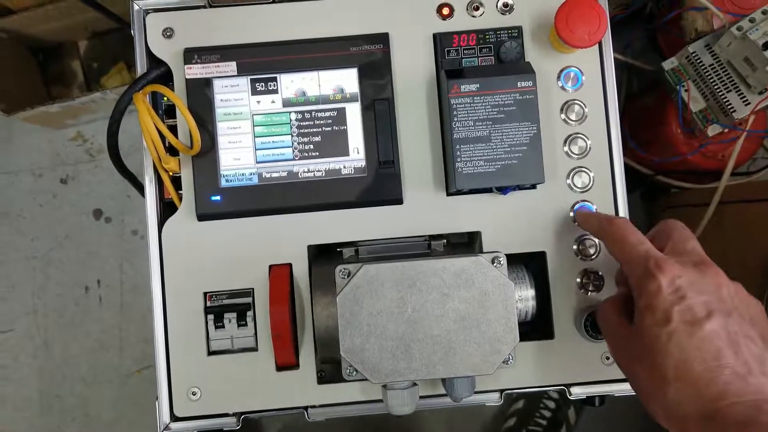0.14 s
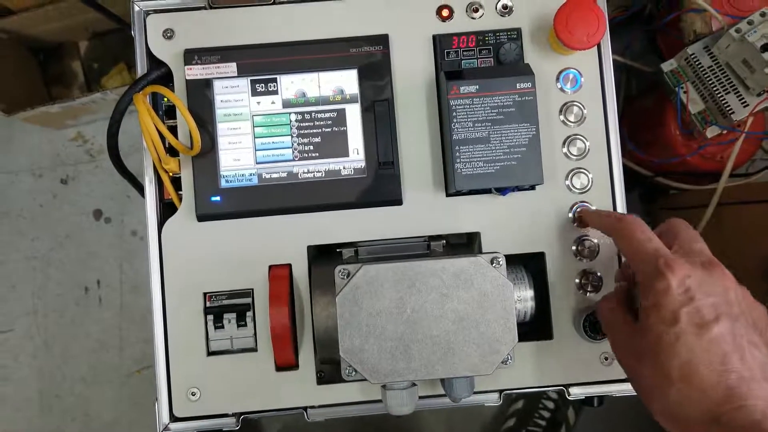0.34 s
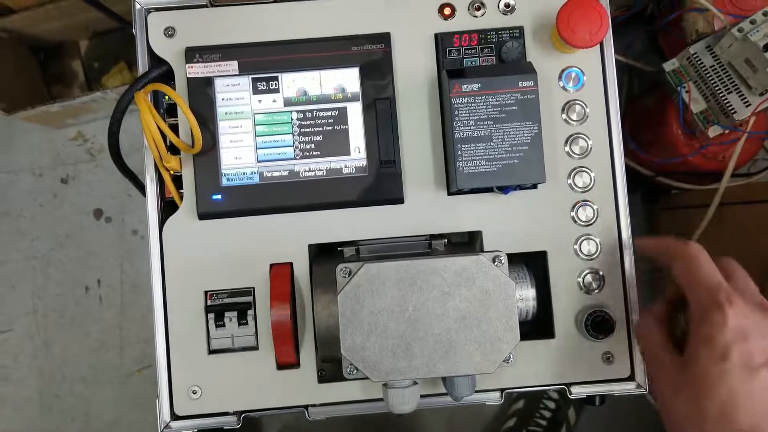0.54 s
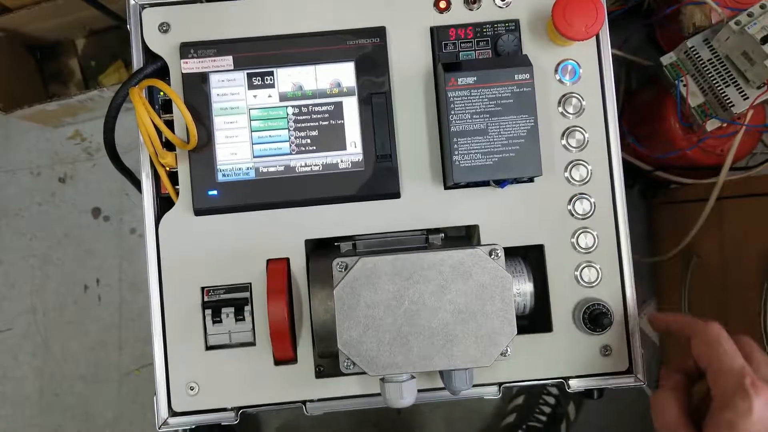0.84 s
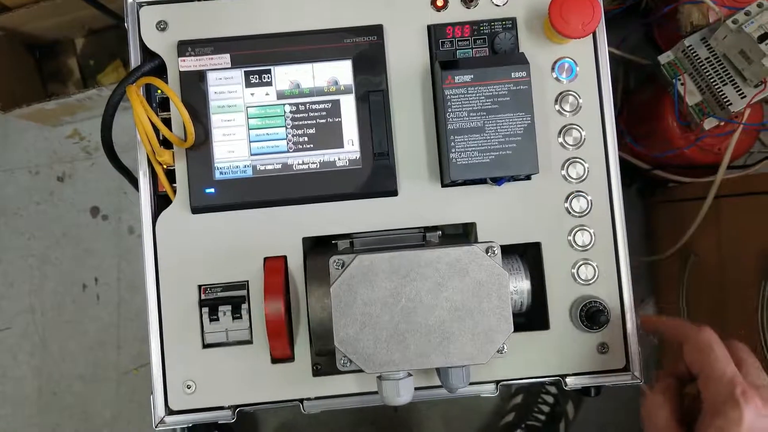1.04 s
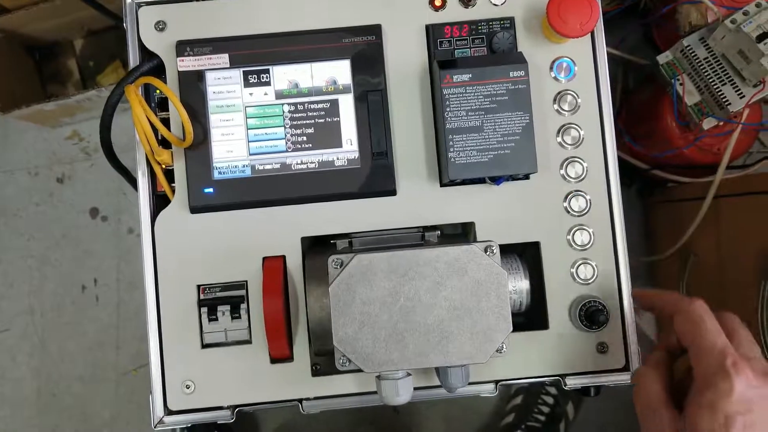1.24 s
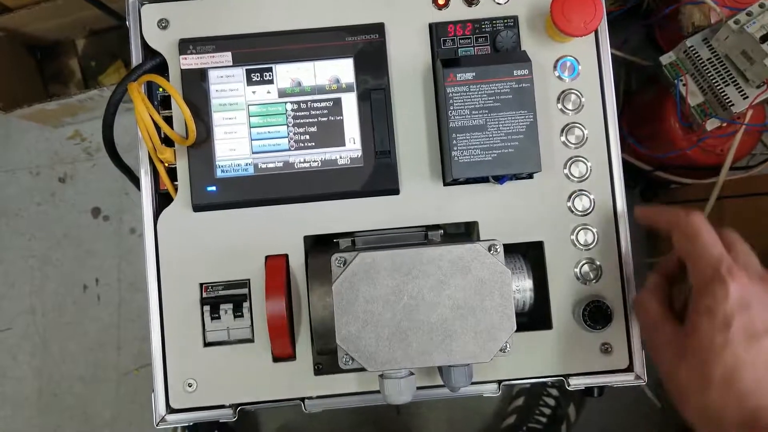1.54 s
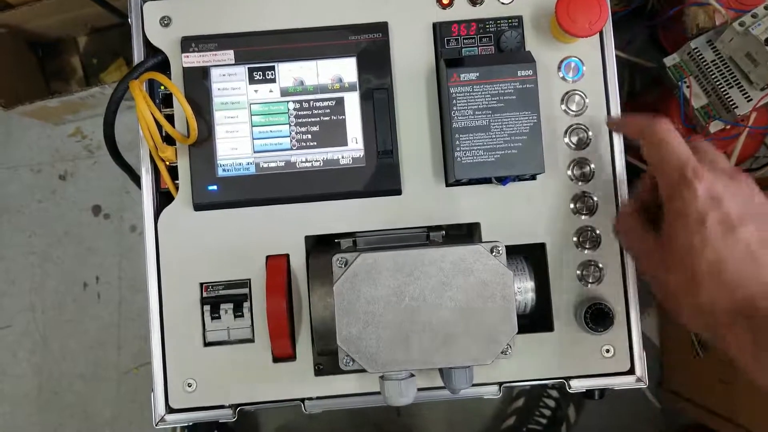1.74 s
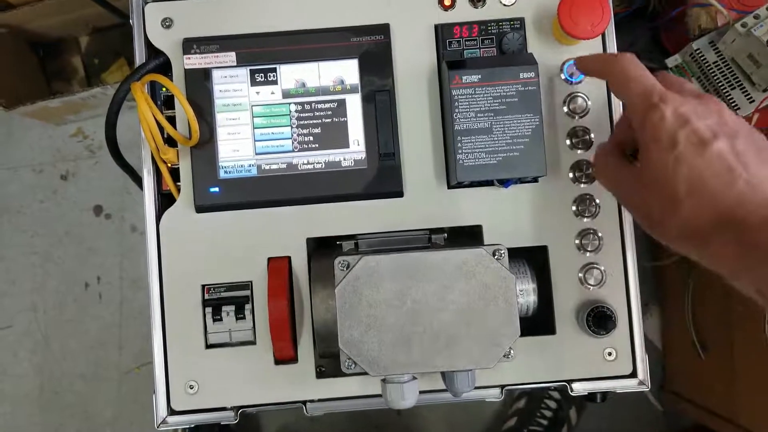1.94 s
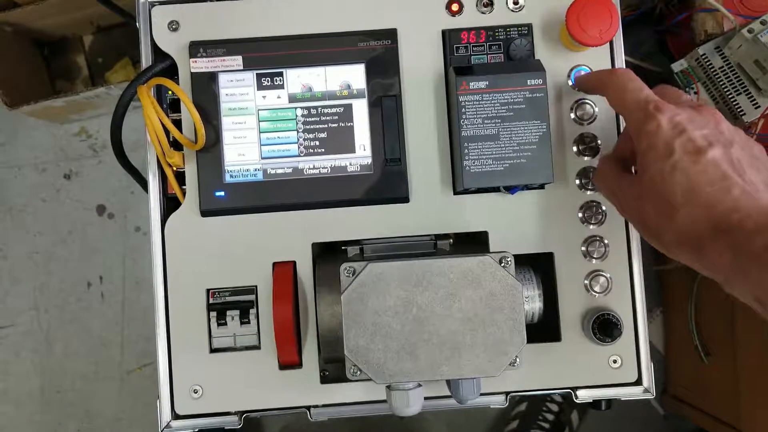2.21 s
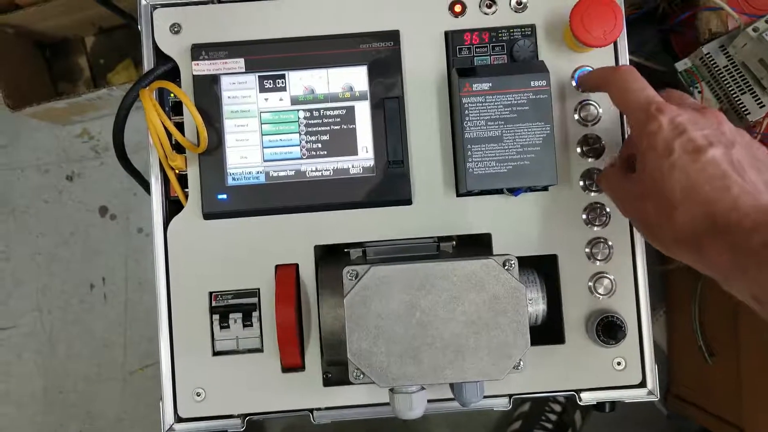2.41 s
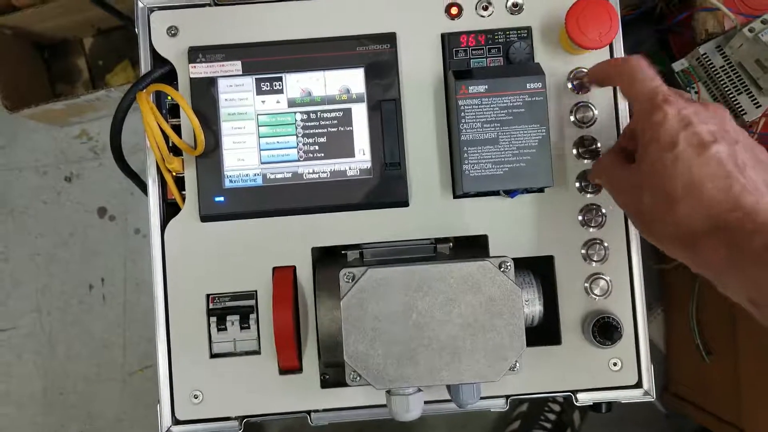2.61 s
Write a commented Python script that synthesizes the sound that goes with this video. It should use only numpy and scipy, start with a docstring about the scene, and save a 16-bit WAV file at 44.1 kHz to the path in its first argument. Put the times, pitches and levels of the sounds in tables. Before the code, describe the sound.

Close up in a quiet indoor workshop, a push button snaps with hollow panel knocks, a small motor runs with very high steady whine and about sixteen scratchy squeaks a second, then clicks off and brakes quickly.

```python
"""A small four-pole motor on a test panel, heard close up. At first it creeps, with short squeals and faint idle tones.
A button clicks as a noise burst, and the panel knocks in two quick groups of ringing modes set off by soft pushes.
Then the inverter drives it: sine sidebands whine near 10 kHz, and the shaft rubs and squeals once a turn.
At 2.5 s a second click stops the drive, the panel knocks faintly and the motor brakes to rest.
Running noise follows the motor; quiet room noise and a low rumble last throughout."""
import sys
import numpy as np
from scipy import signal
from scipy.fft import rfft, irfft
from scipy.io import wavfile
from scipy.ndimage import uniform_filter1d

SR = 44100
rng = np.random.default_rng(int(sys.argv[2]) if len(sys.argv) > 2 else 0)


def volts_from_decibels(level):
    """Turn decibel levels (scalar or array-like) into linear amplitude factors."""
    exponent = np.asarray(level, float) / 20
    return 10 ** exponent


def wav_record(signal):
    """Record a signal, one row per channel, as 16-bit PCM in the file named by sys.argv[1]."""
    frames = np.transpose(np.atleast_2d(signal))
    bounded = np.clip(frames, -1, 1)
    # unit amplitude maps onto the largest positive 16-bit level
    quanta = np.round(bounded * 32767).astype(np.int16)
    wavfile.write(sys.argv[1], SR, quanta)


N = 123480
T = np.arange(N) / SR
WHINE_ON_S, WHINE_OFF_S = 0.21, 2.515


def at(table, hz, col=1):
    """Reads a spectrum table on a log frequency axis."""
    table = np.array(table, float)
    return np.interp(np.log(np.maximum(hz, 1)), np.log(table[:, 0]), table[:, col])


def curve(table):
    """Reads a table of (t/s, value) at every sample."""
    return np.interp(T, *np.array(table, float).T)


def walk(rate):
    """Smooth chance with spread 1, taking about rate new values a second."""
    hold = max(int(SR / rate), 30)
    values = rng.standard_normal(N // 30 + 1)[:N // hold + 1]
    steps = np.repeat(values, hold)[:N]
    smooth = uniform_filter1d(uniform_filter1d(steps, hold), hold)
    return smooth / smooth.std()


def bell(center_s, length_s):
    """A smooth rise and fall around one moment."""
    return np.exp(-((T - center_s) / length_s) ** 2 / 2)


def pan(x, db):
    """Makes the left side louder than the right by db."""
    return x * volts_from_decibels(np.array([[db], [-db]]) / 2)


# how much louder noise is on the left: (f/Hz, level left over right/dB)
BALANCE = [(60, 2), (250, -9), (700, -7.5), (2400, -1.5), (5000, -8), (12000, 2.5)]
# how alike noise is on both sides: (f/Hz, likeness from 0 to 1)
LIKENESS = [(60, 0.8), (300, 0.88), (2000, 0.25), (12000, 0.28)]


def noise(tone):
    """Coloured stereo noise, partly alike on both sides; the average of the sides has rms 1."""
    hz = np.arange(N // 2 + 1) * SR / N
    like = np.clip(at(LIKENESS, hz), 0, 1)
    mid, side = rfft(rng.standard_normal((2, N)))
    sign = np.array([[1], [-1]])  # left, right
    spectrum = mid * np.sqrt(1 + like) + sign * side * np.sqrt(1 - like)
    colour = volts_from_decibels(at(tone, hz) + sign * at(BALANCE, hz) / 2)
    x = irfft(spectrum * colour, N)
    return x / x.mean(0).std()


# switching sidebands of the inverter: (order in drive frequencies from the carrier,
# left rms level/dB, right rms level/dB), levels before drift
SIDEBANDS = [(-7, -64, -67), (-5, -51, -62), (-1, -50, -54), (1, -48, -54), (5, -52, -58), (11, -64, -67),
             (13, -64, -70), (17, -60, -70), (19, -61, -74), (23, -64, -72), (29, -62, -68)]
# colour of the hiss around the sidebands: (f/Hz, relative level/dB per Hz)
WHINE_HISS = [(9000, -18.5), (9900, -2), (11000, -3), (12000, -24)]


def inverter_whine():
    """Switching puts sidebands at multiples of the drive frequency around a carrier; each drifts."""
    carrier_hz, drive_hz = 10000.3, 32.39
    out = np.zeros((2, N))
    for order, left_db, right_db in SIDEBANDS:
        cycles = (carrier_hz + order * drive_hz) * T + rng.random()
        # outer sidebands wander more in phase
        phase = 2 * np.pi * cycles + (0.25 + 0.073 * abs(order)) * walk(4.23)
        drift_db = 1.7 * walk(6)
        for side, (db, lead) in enumerate([(left_db, 1.4), (right_db, 0)]):  # lead in radians
            level = volts_from_decibels(db + drift_db + 0.76 * walk(56.4))
            out[side] += level * np.sqrt(2) * np.sin(phase + lead + 0.69 * walk(5.065))
    return out + volts_from_decibels(-54) * noise(WHINE_HISS)


def case_hum():
    """The case hums on one slightly wandering tone."""
    level = volts_from_decibels(-62 + 1.5 * walk(12))
    hum = level * np.sqrt(2) * np.sin(2 * np.pi * 353.6 * T + 0.3 * walk(9))
    return pan(hum, -8)


# faint inverter tones at rest: (f/Hz, typical peak level before panning/dB)
IDLE = [(10000, -67), (9900, -77), (10100, -72)]


def idle_tones():
    """Faint, flickering tones of the idle inverter, before and after the drive."""
    again_s, rise_s = 2.58, 0.032
    lead = np.array([[2.2], [0]])  # radians, left and right
    idle = np.zeros((2, N))
    for hz, db in IDLE:
        phase = 2 * np.pi * hz * T + lead + 0.8 * walk(30)
        idle += volts_from_decibels(db + 4 * walk(35)) * np.sin(phase)
    resting = (T < WHINE_ON_S) + np.clip((T - again_s) / rise_s, 0, 1)
    return resting * pan(idle, 4)


def inverter():
    """Whine and hum rise and fall with the drive; the idle tones sound at rest."""
    rise_s, fall_s = 0.13, 0.0074
    rise = np.clip((T - WHINE_ON_S) / rise_s, 0, 1)
    fall = np.exp(-np.maximum(T - WHINE_OFF_S, 0) / fall_s)
    return rise * fall * (inverter_whine() + case_hum()) + idle_tones()


def shaft_turning():
    """1 while the shaft is driven, then dying away."""
    return (T > WHINE_ON_S) * np.exp(-np.maximum(T - WHINE_OFF_S, 0) / 0.054)


def nearest(times):
    """Index of the nearest of these times, looked up at every eighth sample."""
    return np.abs(T[::8, None] - times).argmin(1).repeat(8)[:N]


# rubs of the shaft, one a turn: (t/s, first squeal level/dB, second squeal level/dB)
RUBS = [(0.3161, -42.5, -45), (0.376, -38.5, -45), (0.4383, -39, -42.5), (0.5007, -33, -42.5),
        (0.561, -34, -44.5), (0.6248, -39, -43.5), (0.6888, -39, -47), (0.75, -42.5, -46.5),
        (0.812, -39.5, -48), (0.873, -37.5, -41.5), (0.938, -38, -44.5), (0.9997, -40, -45.5),
        (1.067, -44, -47.5), (1.1268, -40, -44.5), (1.188, -46, -48.5), (1.252, -38.5, -46.5),
        (1.3123, -34.5, -47.5), (1.3758, -34, -47.5), (1.4355, -33.5, -46), (1.499, -49, -54.5),
        (1.5634, -41, -46.5), (1.625, -36, -45.5), (1.685, -64, -51.5), (1.7487, -38.5, -48.5),
        (1.8096, -36, -48), (1.8706, -43, -50), (1.934, -41.5, -51), (1.9974, -35, -47.5),
        (2.0604, -39, -47), (2.1212, -38, -48), (2.1826, -40.5, -48), (2.2467, -42, -51.5),
        (2.305, -40.5, -51.5), (2.367, -50, -48), (2.43, -67, -51), (2.497, -52, -52), (2.563, -50, -54)]
# The three tables of squeals that a rub sets off share their columns: (f/Hz, graininess as changes
# per second, lag behind the rub t/s, length/s, pitch sag/Hz per s, level/dB, left over right/dB).
# squeals that follow the first level column of the rubs, level relative to it
FIRST = [(4836, 160, 0.004, 0.0055, 3000, -8.5, -9), (7250, 300, 0.002, 0.007, 3000, -17, -1),
         (5200, 250, 0.0082, 0.0036, -9000, -19, 11)]
# squeals that follow the second level column, level relative to it
SECOND = [(2460, 220, .002, .0075, 4500, 2, -1), (2730, 260, -.012, .007, 6000, -1, -1),
          (3750, 400, -.004, .012, 3000, -14, -3), (6600, 200, -.004, .008, 2000, -8, 0),
          (12100, 600, .004, .009, 4000, -7, 1)]
# low squeal, about the same level each turn, fading after the drive stops
LOW = [(1193, 220, .001, .008, 1500, -47, -1.5)]


def rubbing():
    """Each turn's rub swells grainy squeals of bending pitch at set lags; faint ones fill the gaps."""
    rubs, out, turning = np.array(RUBS), np.zeros((2, N)), shaft_turning()
    rub_s = rubs[:, 0]
    low_db = 20 * np.log10(turning[(rub_s * SR).astype(int)])
    for level_db, modes in [(rubs[:, 1], FIRST), (rubs[:, 2], SECOND), (low_db, LOW)]:
        for k, (hz, grain_rate, lag, length, sag_hz, db, pan_db) in enumerate(modes):
            grainy = k > 0  # the first squeal of each table holds a clear tone; the others are grainier
            chance = rng.standard_normal((len(rubs), 3))
            center_s = rub_s + lag + 0.0015 * chance[:, 0]
            turn = nearest(center_s)
            dt = T - center_s[turn]
            level = volts_from_decibels(level_db[turn] + (1 + grainy) * chance[turn, 1])
            swell = level * np.exp(-np.abs(dt / length) ** 3 / 4)
            pitch = hz * (1 + 0.0066 * chance[turn, 2]) - sag_hz * np.clip(dt, -0.02, 0.02)
            grain = walk(grain_rate) + 1j * walk(grain_rate)
            squeal = swell * ((not grainy) + (0.25 + 0.5 * grainy) * grain)
            between = volts_from_decibels(np.median(level_db) - 22.0) * turning * grain
            tone = volts_from_decibels(db) * (squeal + between) * np.exp(2j * np.pi * np.cumsum(pitch) / SR)
            # the right side's phase wanders against the left
            wander = np.exp(1j * np.array([[0], [1]]) * 1.326 * walk(39.86))
            out += pan((tone * wander).real, pan_db)
    return out


# slow squeals while creeping and braking: (t/s, length/s, f/Hz, typical peak level before panning/dB)
CREEP = [(0.01, 0.025, 2405, -53.5), (0.013, 0.037, 4800, -60), (0.178, 0.0087, 2413, -53.5),
         (0.181, 0.0074, 7080, -45.5), (0.2, 0.043, 4790, -60), (0.217, 0.014, 2405, -53.5),
         (2.6, 0.033, 2124, -63.5)]


def creeping():
    """Slow turning lets out short squeals that flicker in level and phase."""
    out = np.zeros((2, N))
    for s, length, hz, db in CREEP:
        level = volts_from_decibels(db + 3.4 * walk(152.6)) * bell(s, length)
        out += pan(level * np.sin(2 * np.pi * hz * T + 2.1 * walk(91.4)), -8.5)
    return out


# colour of the noise of bearings and air: (f/Hz, relative level/dB per Hz)
RUNNING = [(100, -13), (290, -13.5), (355, -7), (420, -7), (500, -2.5), (690, -15.5), (1180, 3.5),
           (1730, -16), (2750, -3), (3120, -23), (3610, -13.5), (4400, -20), (4850, -12), (5700, -16.5),
           (6600, -12.5), (7300, -18), (8410, -33.5), (12000, -10), (15500, -19.5)]
# its level before the swell of each turn: (t/s, level/dB)
RUNNING_LEVEL = [(0, -65), (.1, -61.5), (.18, -65.5), (.23, -62.5), (.3, -58), (2.2, -57.5), (2.55, -53),
                 (2.66, -67.5), (2.8, -73.5)]


def running_noise():
    """Bearings and air make coloured noise that swells once a turn, just ahead of the rub."""
    rub_s = np.array(RUBS)[:, 0]
    dt = T - rub_s[nearest(rub_s)] + 0.0059
    pulse_db = 7 * shaft_turning() * np.exp(-(dt / 0.025) ** 2 / 2)
    return noise(RUNNING) * volts_from_decibels(curve(RUNNING_LEVEL) + pulse_db + 0.97 * walk(20))


# button clicks: (t/s, level/dB, chatter length/s, tail level relative to the click/dB, tail time to fall 60 dB/s)
CLICKS = [(0.2295, -35, 0.01, -5, 0.21), (2.512, -33.5, 0.0094, -7.5, 0.22)]
# colour of the clicks: (f/Hz, relative level/dB per Hz)
CLICK_TONE = [(470, -20), (1500, -9.5), (3180, -3), (5280, 2.5), (8120, -5.5), (15300, -4.5), (16500, -56)]


def clicks():
    """Contact chatter as a fluttering noise burst, then a short tail from the walls."""
    out, hiss = np.zeros((2, N)), noise(CLICK_TONE)
    for s, db, chatter_s, tail_db, t60 in CLICKS:
        dt = np.maximum(T - s, 0)
        chatter = np.exp(-(dt / chatter_s) ** 3) * volts_from_decibels(1.2 * walk(900))
        tail = volts_from_decibels(tail_db - 60 * dt / t60)
        attack = np.minimum(dt / 0.0011, 1)
        out += attack * volts_from_decibels(db) * (chatter + tail) * hiss
    return out


# knocks on the panel: (t/s, level before weighting by the push/dB, push length/s)
KNOCKS = [(.2425, -25, .001), (.247, -26, .0013), (.2535, -27, .0022), (.3012, -24, .0027),
          (.309, -28, .0046), (2.52, -45, .001), (2.532, -43, .0038), (2.56, -45, .0052),
          (2.617, -49, .0033)]
# ringing modes of the panel: (f/Hz, level relative to the knock/dB, time to fall 60 dB/s)
PANEL = [(205, -4, .16), (335, -1, .11), (395, 4, .06), (463, -1, .16), (530, 1, .08), (780, -3, .07),
         (880, -3, .05), (1140, -1, .045), (1210, -5, .05)]


def knocks():
    """Soft pushes ring the panel modes, weighted and tuned afresh for each knock."""
    out = np.zeros(N)
    for s, db, push_s in KNOCKS:
        dt = np.maximum(T - s, 0)
        attack = np.minimum(dt / push_s, 1)
        for hz, mode_db, t60 in PANEL:
            chance_db, detune = rng.standard_normal(2)
            # a push drives best the modes whose period is near its own length
            soft = 2 * (hz * push_s) ** 4 / (1 + (hz * push_s) ** 7)
            level = volts_from_decibels(db + mode_db + chance_db - 60 * dt / t60)
            out += level * soft * attack * np.sin(2 * np.pi * hz * (1 + 0.005 * detune) * dt)
    return pan(out, -6.0)


# swells of handling in the rumble: (t/s, length/s, level before panning/dB)
RUMBLE = [(.31, 0.031, -58.5), (.8, 0.023, -53.5), (0.889, 0.032, -53.5), (1.11, 0.019, -51),
          (1.19, 0.025, -59.5), (2.55, 0.04, -59)]
# colour of the rumble: (f/Hz, relative level/dB per Hz)
RUMBLE_TONE = [(20, 10), (55, 22.5), (80, 16.5), (120, 8.5), (180, -67)]


def rumble():
    """Steady low noise that swells now and then with handling."""
    level = volts_from_decibels(-66.5) + sum(volts_from_decibels(db) * bell(s, length) for s, length, db in RUMBLE)
    return pan(noise(RUMBLE_TONE), -7.5) * level


# colour of the quiet room: (f/Hz, relative level/dB per Hz)
ROOM = [(59, -4), (100, -54), (206, -0.5), (239, -13.5), (461, -13), (9210, -36), (9820, -21), (16000, -22)]


def room():
    """Steady, quiet, coloured noise of the room."""
    return noise(ROOM) * volts_from_decibels(-67)


def scene():
    """The motor, button and panel over rumble and room."""
    motor = inverter() + rubbing() + creeping() + running_noise()
    return motor + clicks() + knocks() + rumble() + room()


def low_pass(x):
    """Removes everything above the highest recorded frequency."""
    return signal.sosfilt(signal.butter(12, 16970, fs=SR, output="sos"), x)


def record(dry):
    """The left port hears slightly later; the top is cut and a narrow band near 3 kHz is notched."""
    ports = [np.roll(dry[0], 2), dry[1]]  # left later by 2 samples
    top_cut = signal.ellip(6, 0.3, 50, 15900, fs=SR, output="sos")  # Hz
    x = signal.sosfilt(top_cut, ports)
    mix = signal.lfilter(*signal.iirnotch(3170, 7, SR), x)  # Hz, sharpness
    return low_pass(mix)


dry = scene()
out = record(dry)
wav_record(out)
```